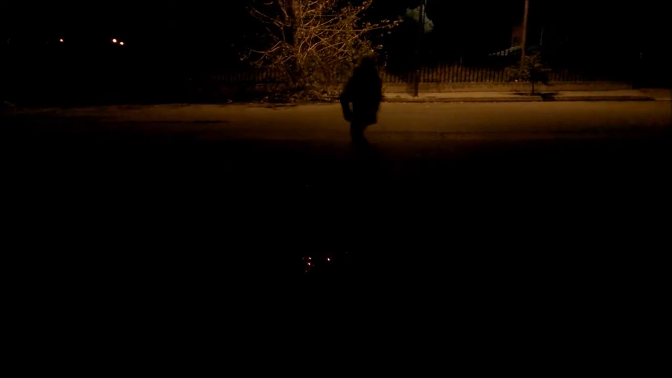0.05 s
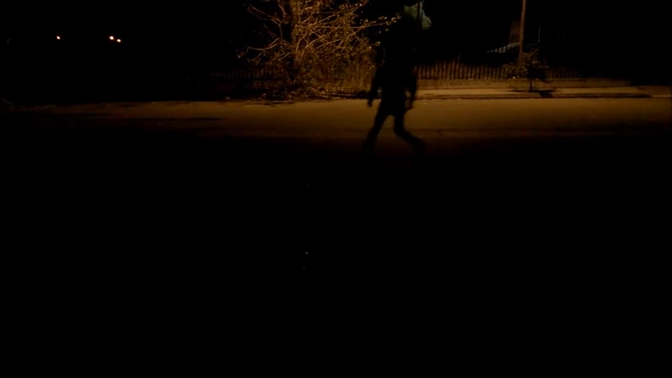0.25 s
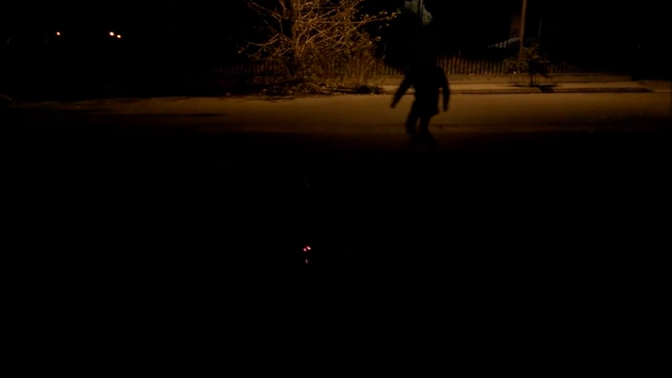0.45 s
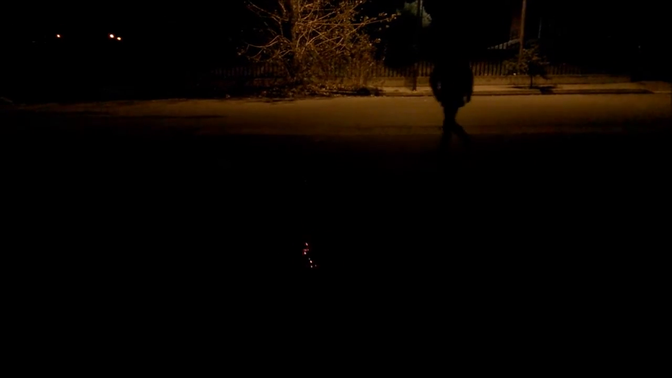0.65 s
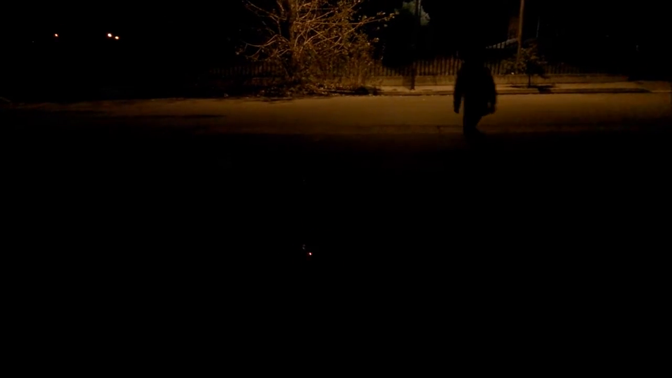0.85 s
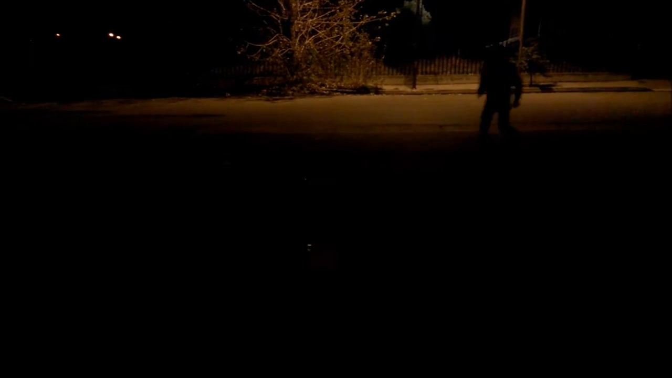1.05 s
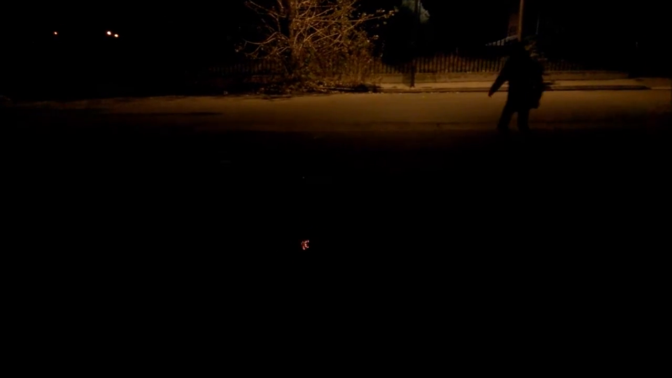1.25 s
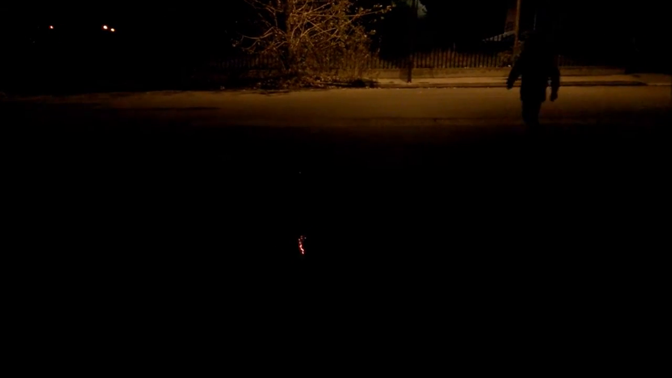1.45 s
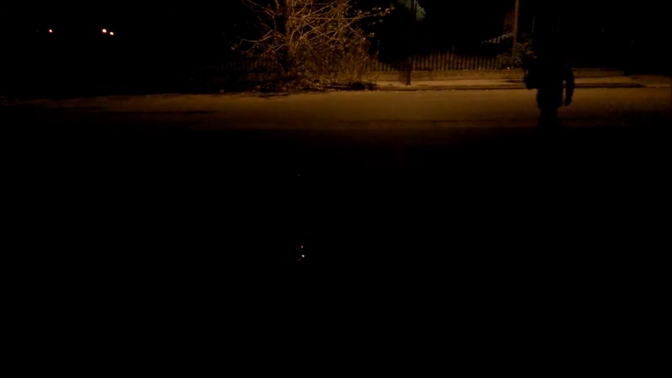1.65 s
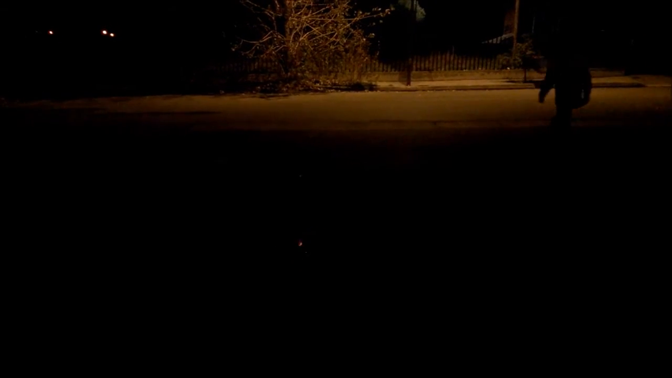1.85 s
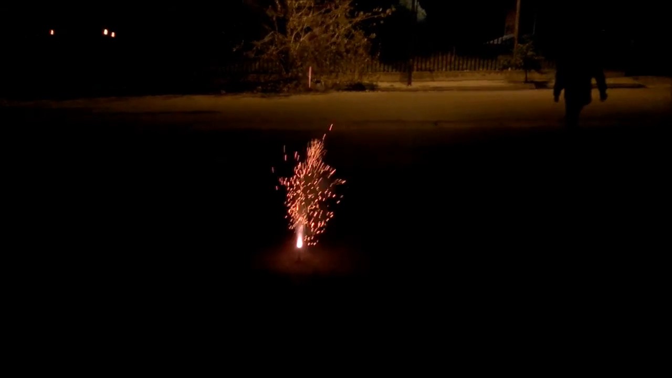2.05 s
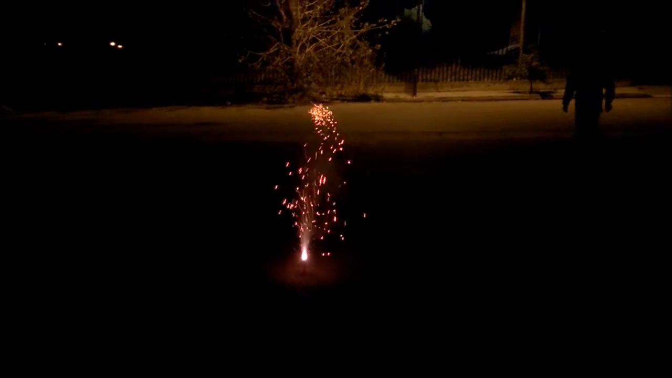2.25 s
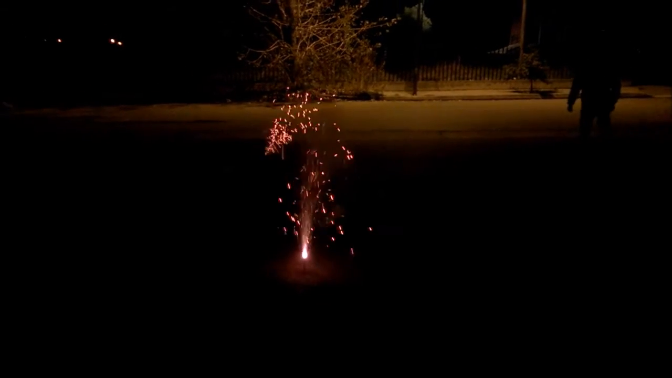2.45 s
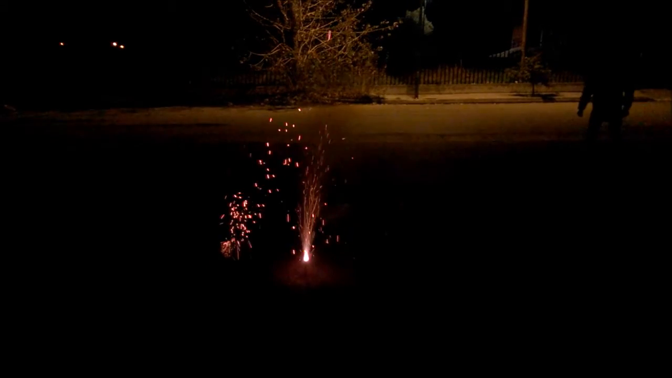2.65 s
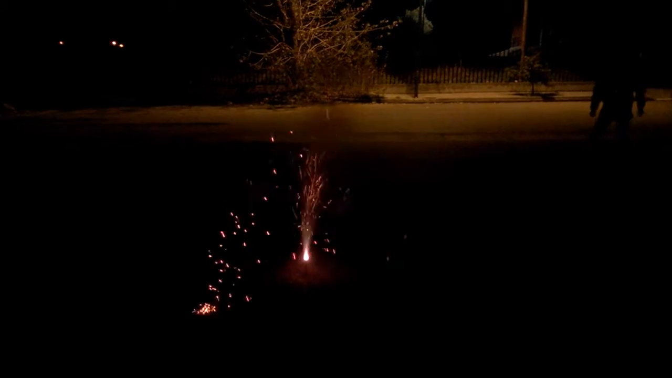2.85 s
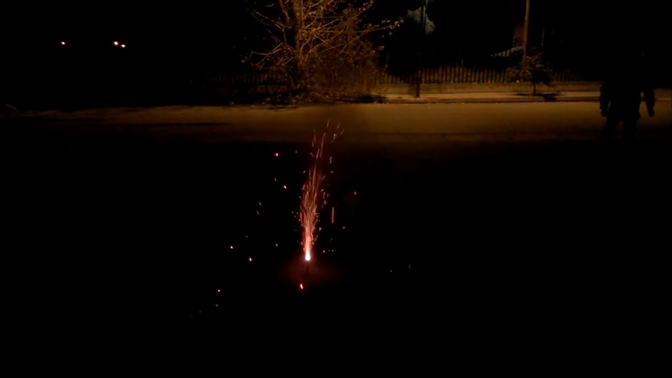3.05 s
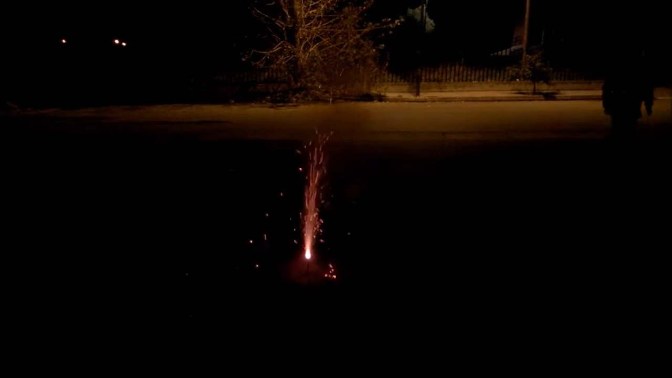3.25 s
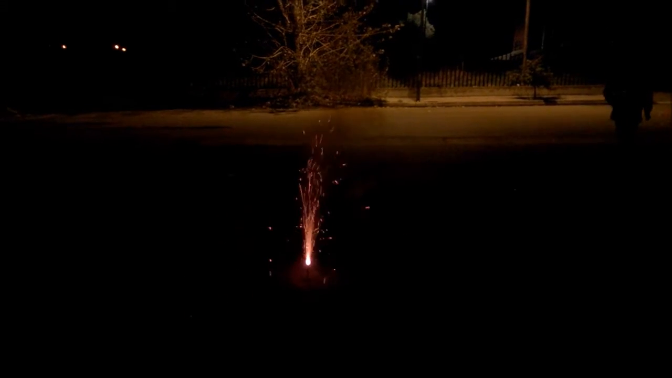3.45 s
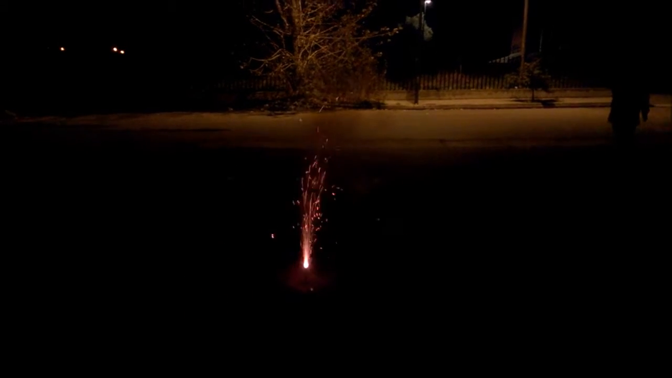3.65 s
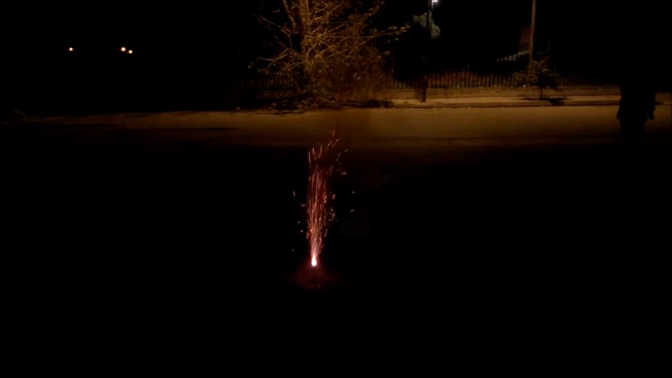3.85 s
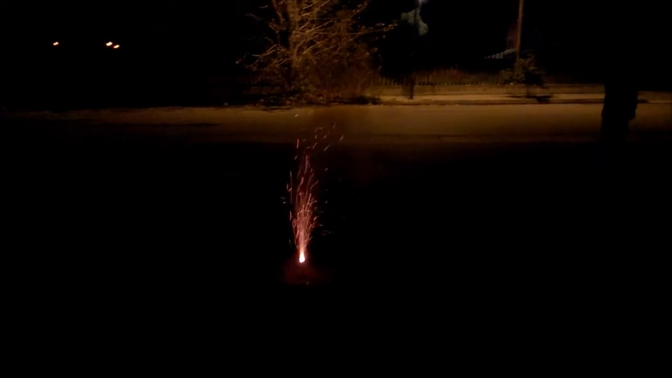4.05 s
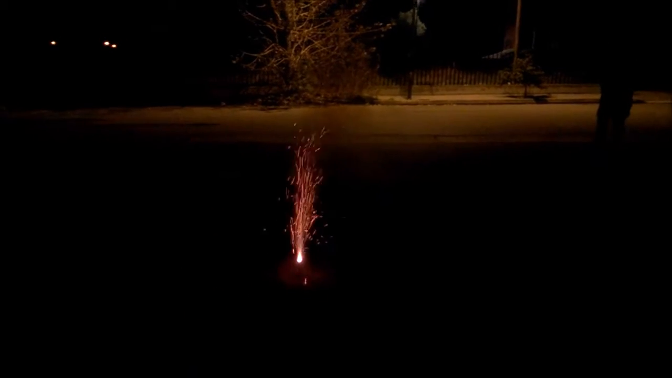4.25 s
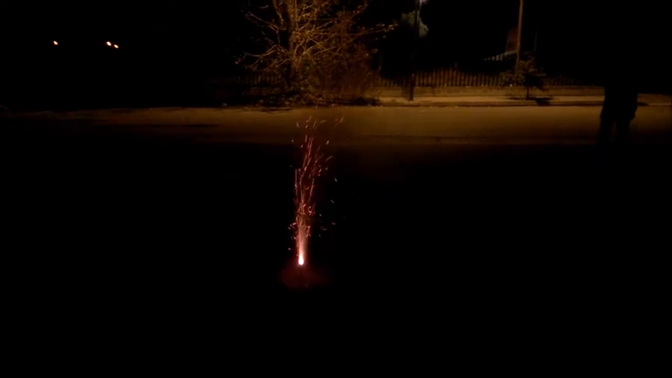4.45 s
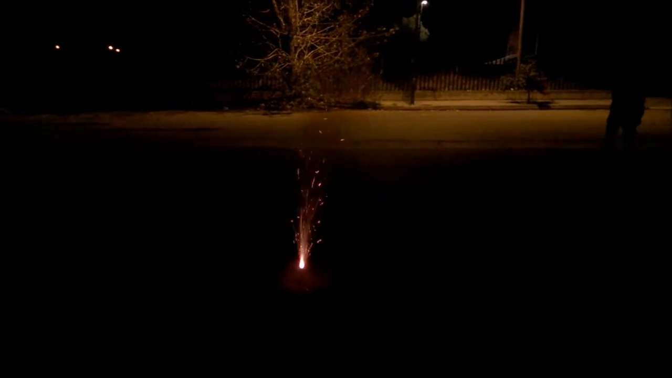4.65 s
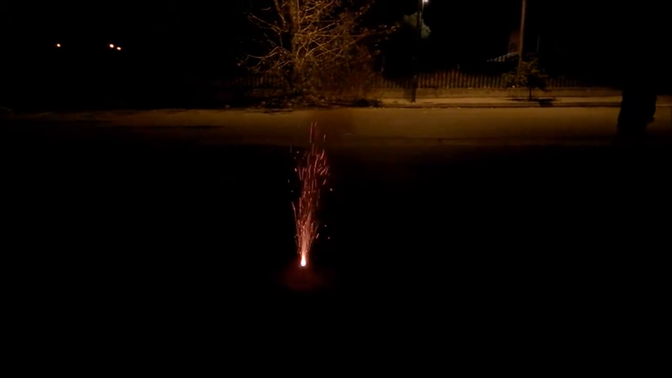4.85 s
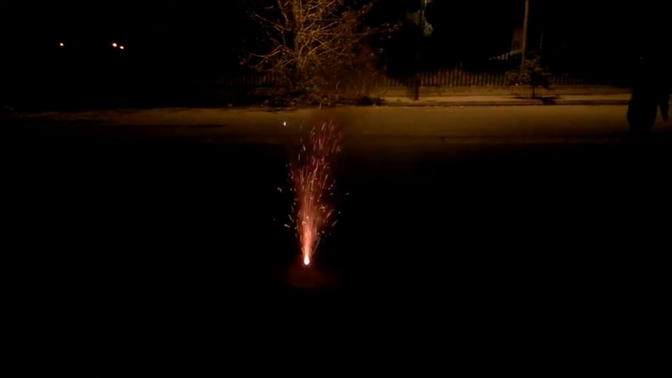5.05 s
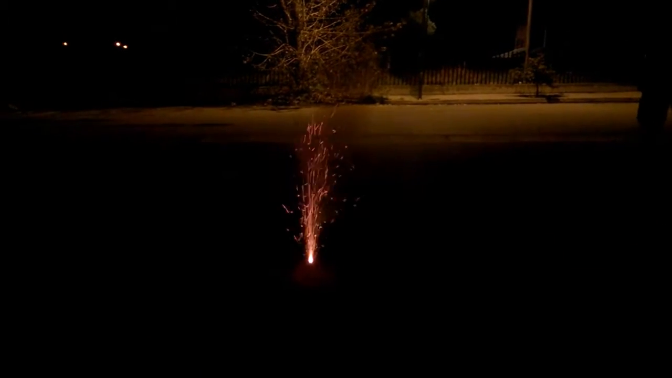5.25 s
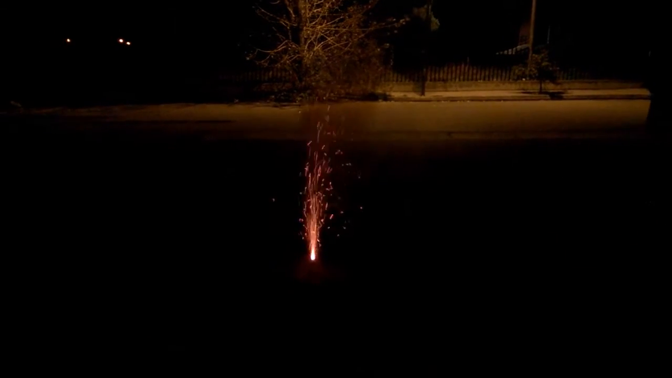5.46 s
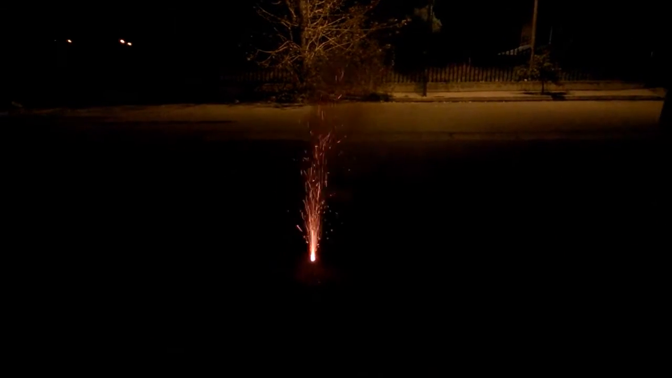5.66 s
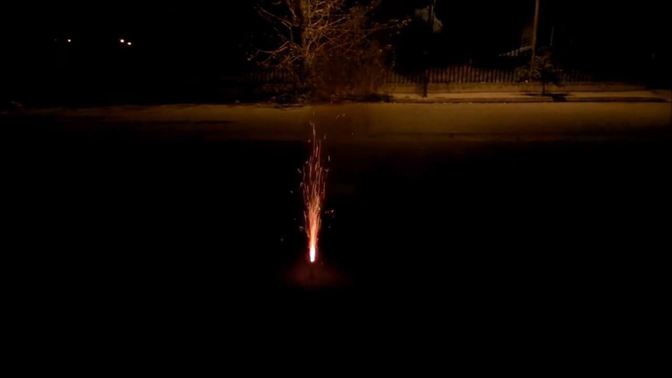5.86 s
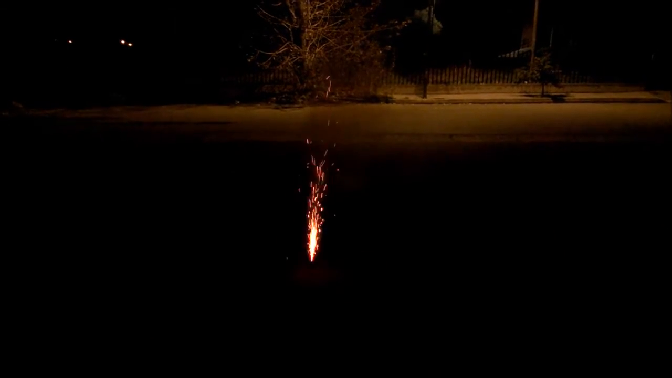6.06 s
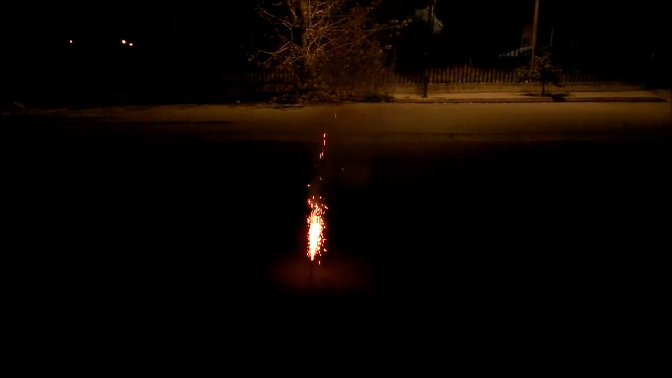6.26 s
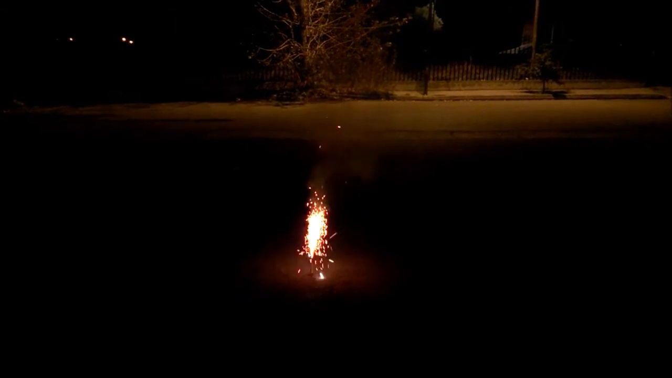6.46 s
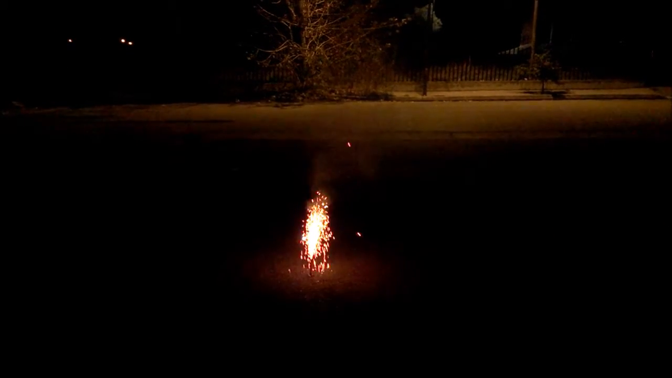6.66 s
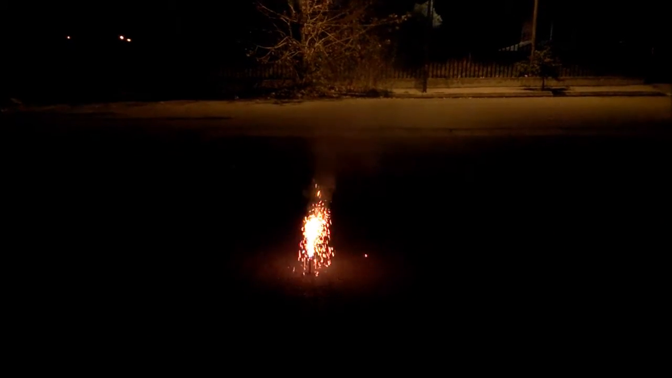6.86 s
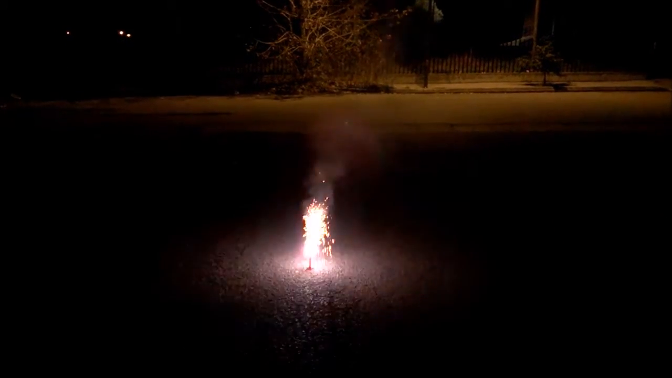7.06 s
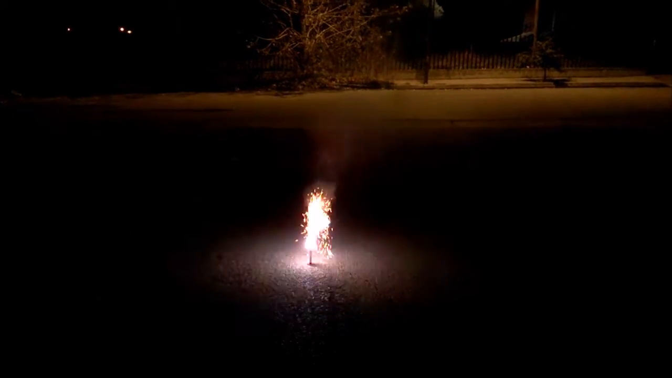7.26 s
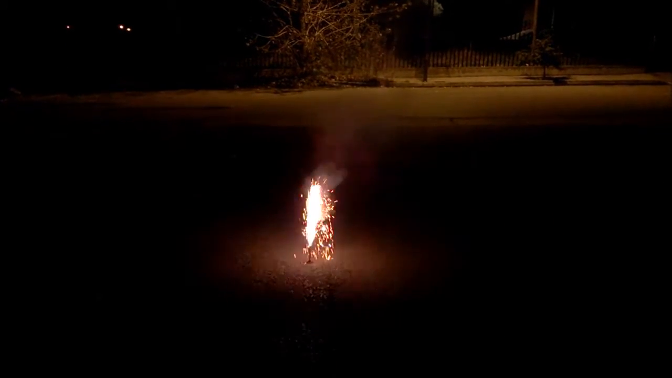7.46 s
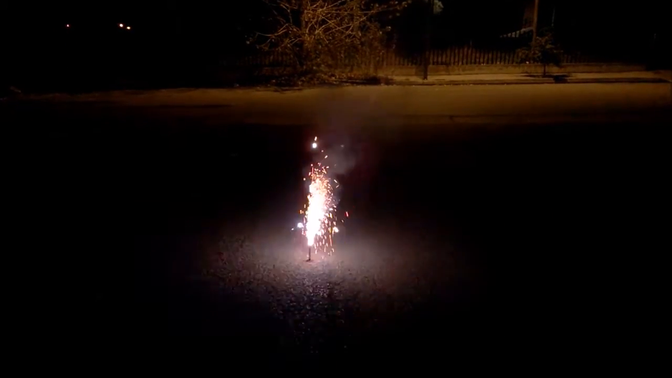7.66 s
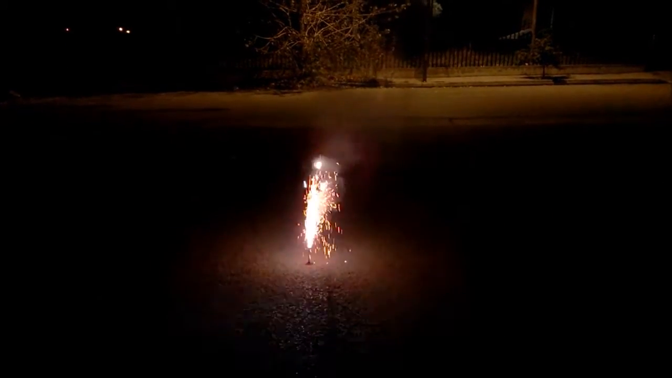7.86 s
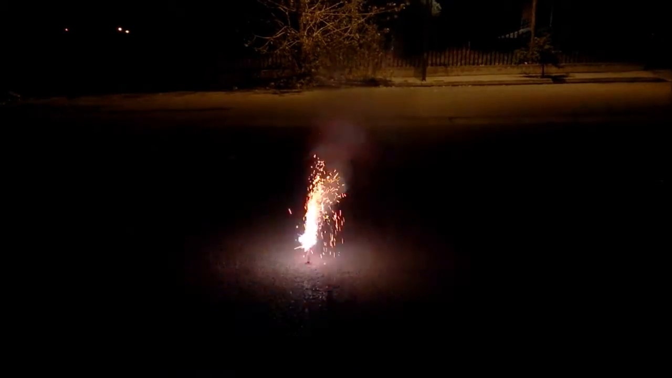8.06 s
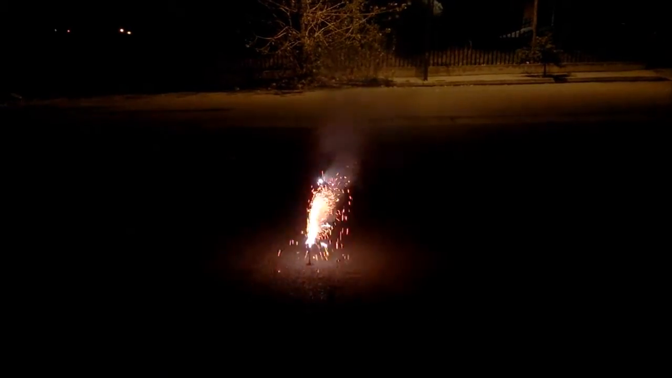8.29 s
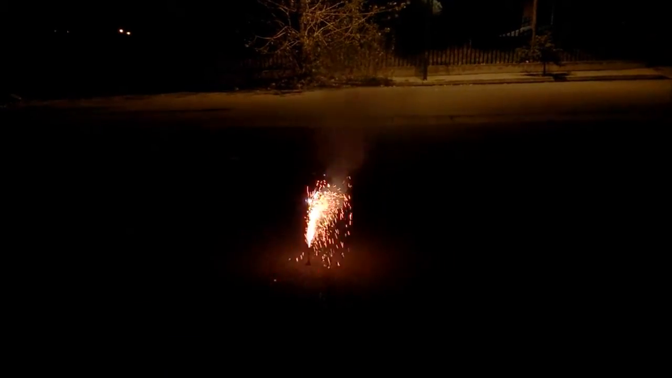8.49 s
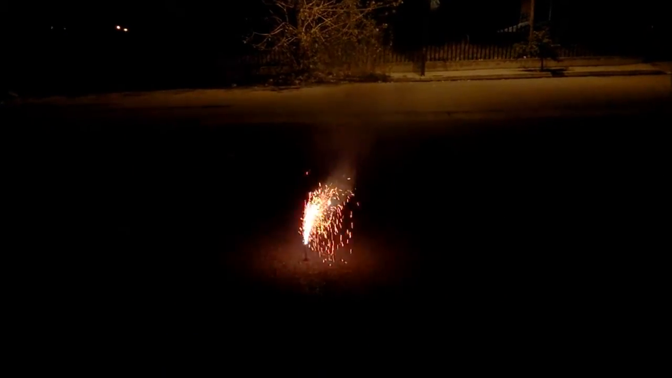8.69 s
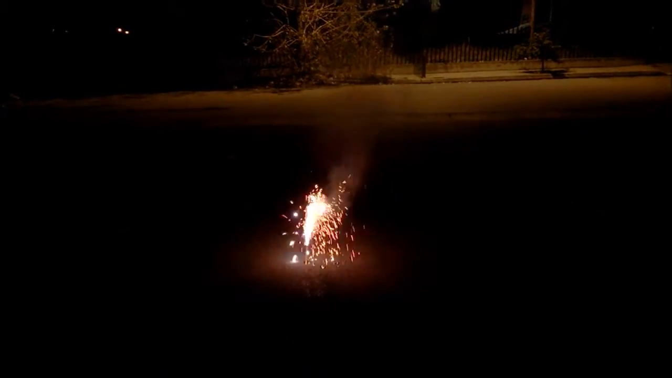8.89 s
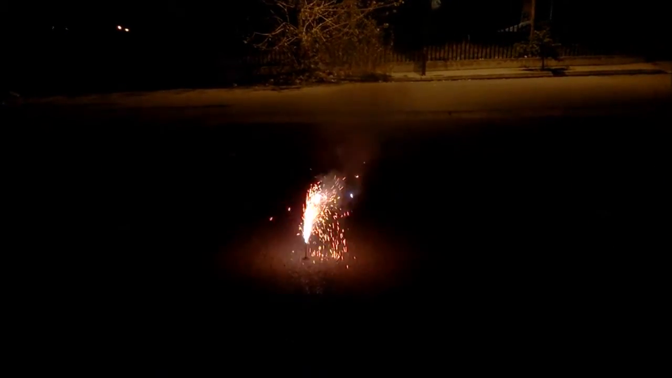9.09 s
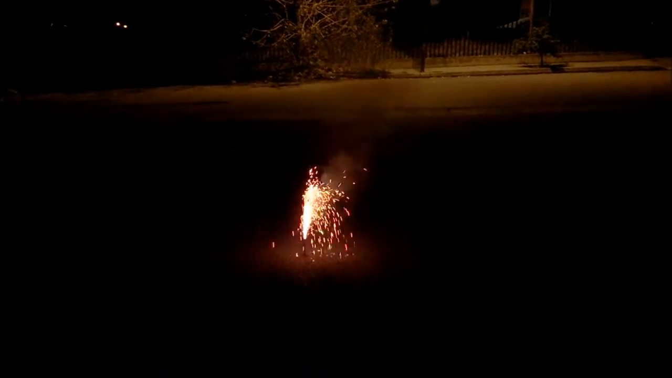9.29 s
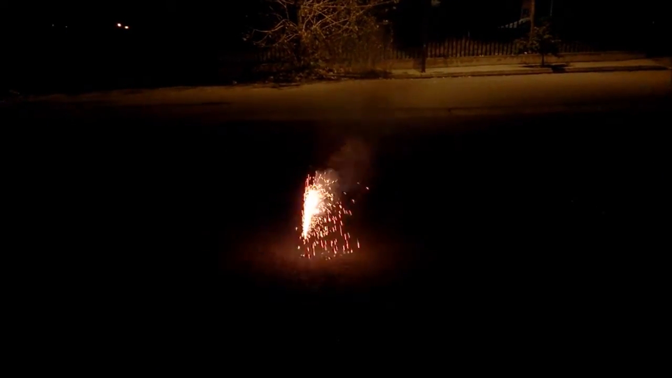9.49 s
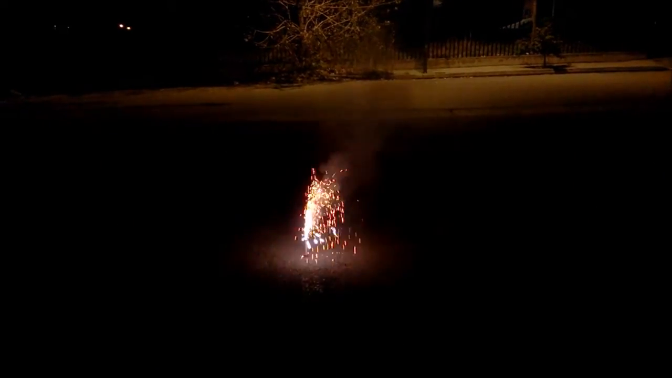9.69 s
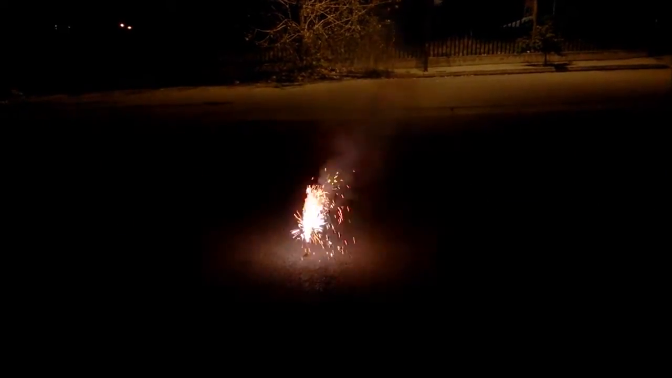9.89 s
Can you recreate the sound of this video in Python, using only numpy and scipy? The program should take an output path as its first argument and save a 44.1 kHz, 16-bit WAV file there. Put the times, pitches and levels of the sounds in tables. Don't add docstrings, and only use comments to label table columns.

```python
import sys
import numpy as np
from scipy import signal
from scipy.fft import rfft, irfft, next_fast_len
from scipy.io import wavfile
from scipy.ndimage import uniform_filter1d

SR = 44100
rng = np.random.default_rng(int(sys.argv[2]) if len(sys.argv) > 2 else 0)


def bounce(signal):
    frames = np.transpose(np.atleast_2d(signal))
    limited = np.clip(frames, -1, 1)
    pcm = np.round(limited * 32767).astype(np.int16)
    wavfile.write(sys.argv[1], SR, pcm)


def undo_db(level):
    steps = np.asarray(level, float) / 20
    return 10 ** steps


N = 437913
TIME = np.arange(N) / SR

LIT_S, OUT_S, CHOKE_S = 1.966, 5.94, 4.999
BURNING = slice(int(1.958 * SR), int(6.2 * SR))

# time in seconds, main line in dB, half-pitch lines in dB, roar in dB.
BURN_LEVELS = [(1.98, -6.5, -9, -40.5), (2.4, -8.5, -12, -45), (2.55, -14.5, -8, -43),
               (2.75, -6.5, -8.5, -43), (2.92, -9, -9.5, -43.5), (3.05, -9.5, -13, -43),
               (3.4, -14, -10.5, -46.5), (3.8, -13.5, -10.5, -51), (4.29, -17, -15.5, -55.5),
               (4.325, -20.5, -30.5, -58.5), (4.36, -17.5, -16, -56.5), (4.68, -18.5, -17, -58),
               (4.72, -19, -24, -57.5), (4.87, -19.5, -41.5, -55), (4.91, -18.5, -10, -57.5),
               (4.97, -21.5, -18, -53), (5.04, -16, -19.5, -56.5), (5.1, -18, -11.5, -47),
               (5.3, -19, -14.5, -47.5), (5.65, -19, -14.5, -53.5), (5.82, -20, -19.5, -50.5),
               (5.9, -18.5, -25, -54), (5.95, -22, -33, -58.5)]
# frequency in Hz, gain in dB.
PATH_RESPONSE = [(1300, -5.5), (2000, -3), (3000, 6), (4300, -9), (5300, -1.5), (6300, 5), (6900, 9),
                 (7800, 12.5), (8200, 1.8), (8900, 3.5), (9500, 8.5), (10250, 12), (10700, 6.5),
                 (11100, 10), (11600, 2), (12500, 5.5), (14000, -4.5), (15000, -14.5), (15700, -17.5)]
# frequency in Hz, density in dB per Hz.
FLUTTER_SPECTRUM = [(76, -26.5), (130, 6), (524, -7.5), (597, -9), (1020, -11), (1200, -18), (1560, -13.5),
                    (2640, -120)]


def columns(table):
    s, *rest = np.transpose(table)
    return [np.interp(TIME, s, c) for c in rest]


def on_log(hz, points):
    f, v = np.transpose(points)
    return np.interp(np.log(np.maximum(hz, 1)), np.log(f), v)


def unit(x):
    return x / np.sqrt(np.mean(np.abs(x) ** 2))


def colour(x, points):
    size = next_fast_len(len(x))
    gain = undo_db(on_log(np.fft.rfftfreq(size, 1 / SR), points))
    return irfft(rfft(x, size) * gain, size)[:len(x)]


def noise(points):
    return unit(colour(rng.standard_normal(N), points))


def walk(rate_hz):
    size = max(int(SR / rate_hz), 1)
    return unit(uniform_filter1d(uniform_filter1d(rng.standard_normal(N), size), size))


def complex_walk(real_hz, imag_hz):
    return (walk(real_hz) + 1j * walk(imag_hz))[BURNING]


def held(rate_hz):
    step = np.cumsum(rng.random(N) < rate_hz / SR)
    return uniform_filter1d(rng.standard_normal(N)[step], size=90)


def add(out, s, shape):
    start = int(s * SR)
    out[start:start + len(shape)] += shape


def peak(s, before_s, after_s):
    return np.interp(TIME, (s - abs(before_s), s, s + abs(after_s)), (0, 1, 0))


def scatter(times, gains, shape):
    out = np.zeros(N)
    out[(np.asarray(times) * SR).astype(int)] = gains
    return signal.fftconvolve(out, shape)[:N]


def patchy(x, depth_db):
    parts = signal.stft(x, SR, nperseg=256)[2]
    field = uniform_filter1d(rng.standard_normal(parts.shape), size=3, axis=0)
    field = uniform_filter1d(field, size=18, axis=1)
    return signal.istft(parts * undo_db(depth_db * (unit(field) - .3)), SR)[1][:len(x)]


def night():
    # frequency in Hz, density in dB per Hz.
    spectrum = [(150, -40), (250, -0.5), (427, -10.5), (823, -7), (1560, -10), (2200, -17), (3630, -23.5),
                (7630, -20), (15500, -30.5)]
    gain_db = np.interp(TIME, (5.9, 6, 9), (0, -9, -4))
    return undo_db(-61.5 + gain_db + 1.6 * walk(2.3)) * noise(spectrum)


def low_air():
    # time in seconds, rise in dB.
    gusts = [(0.0, 11.5), (.404, 8.5), (.572, 14.5), (.798, 7.5), (1.048, 0.5), (.76, 3), (1.15, 4.5),
             (1.23, 11.5), (1.31, 13), (1.39, 10.5), (1.58, 9), (1.68, 8), (1.94, 8), (6.138, 8),
             (6.34, 3.5), (6.48, 14), (6.67, 6.5), (7.3, 10.5), (7.66, 8.5), (7.85, 5), (8.12, 5.5),
             (8.5, 9.5), (8.93, 11), (9.18, 2), (9.44, 4)]
    # time in seconds, thump in dB, flutter in dB.
    thumps = [(1.994, -14.5, -21), (2.049, -19.5, -19), (2.199, -40.5, -31.5), (2.11, -38, -40.5),
              (2.28, -40.5, -32), (2.377, -35, -30.5), (3.047, -37, -37), (3.201, -31.5, -36.5),
              (3.269, -35, -37), (3.34, -34.5, -32), (3.6, -31.5, -50.5), (4.05, -34, -68),
              (4.231, -31, -50.5), (4.38, -38, -53), (4.51, -33, -50), (4.63, -41.5, -54),
              (4.958, -36, -36), (5.097, -31, -32), (5.17, -40.5, -31.5), (5.251, -42.5, -38),
              (5.33, -40, -41.5), (5.449, -40, -56.5), (5.6, -36.5, -59)]
    # frequency in Hz, density in dB per Hz.
    rumble_spectrum = [(12, -11.5), (28, -2.5), (44, -5), (55, 1), (70, 0), (110, -9), (200, -16.5),
                       (400, -45.5)]
    wind_db, gust_s = -54, 0.049
    rise_db_per_s, fall_db_per_s = 498.5, 252.5

    ducked_db = -12.5 * peak(6., .1, 20)
    gust_db = sum(db * peak(s, 0.63 * gust_s, 0.87 * gust_s) for s, db in gusts)
    burning = (TIME > LIT_S) * undo_db(np.minimum(fall_db_per_s * (5.8 - TIME), 0))
    rumble = undo_db(wind_db + ducked_db + gust_db)
    rumble = rumble + undo_db(-43.5 + 1.2 * walk(9.8)) * burning

    flame_db = -8.5 + uniform_filter1d(hiss_db(), size=4000)
    jet_db = columns(BURN_LEVELS)[2] * 0.62 - 20.5 + 1.4 * walk(5)
    flutter = undo_db(-68.5 + 3.0 * ducked_db) + undo_db(flame_db) * (TIME > OUT_S)
    flutter = flutter + undo_db(jet_db) * burning

    age_s = np.arange(-1300, 12000) / SR
    shape = undo_db(np.minimum(rise_db_per_s * age_s, -fall_db_per_s * age_s))
    for s, thump_db, flutter_db in thumps:
        lit = s + age_s > LIT_S
        add(rumble, s + age_s[0], undo_db(thump_db) * shape * lit)
        add(flutter, s + age_s[0], undo_db(flutter_db) * shape ** 1.5 * lit)
    rumble = rumble * undo_db(1.7 * walk(18)) * noise(rumble_spectrum)
    return rumble + flutter * undo_db(2 * walk(63)) * noise(FLUTTER_SPECTRUM)


def hiss_db():
    # time in seconds, level in dB.
    spray_levels = [(6.4, -81), (6.88, -67.5), (6.95, -55), (7.06, -54.5), (7.3, -51), (7.4, -50),
                    (7.495, -49), (7.51, -57), (7.59, -49.5), (7.62, -50), (7.85, -50.5), (7.97, -53),
                    (7.99, -52.5), (8.2, -56), (8.7, -56.5), (8.865, -59.5), (8.875, -52), (8.95, -59.5),
                    (9.2, -57), (9.93, -56.5)]
    # clearing time in seconds, depth in dB, clogging in seconds.
    clogs = [(6.927, 7.5, .04), (7.124, 4.5, .03), (7.069, 8, 0.06), (7.331, 15.5, 0.035), (7.405, 7, 0.1),
             (7.59, 1, 0.0304), (7.689, 14, 0.053), (7.738, 9, 0.12), (7.822, 22, .06), (8.027, 7, 0.05),
             (8.079, 6.5, 0.096), (8.191, 6, 0.031), (8.283, 11.5, 0.067), (8.444, 14, .04),
             (8.601, 19, 0.12), (8.652, 27, .05), (8.835, 11, 0.05), (9.005, 11.5, 0.057),
             (9.148, 14, 0.066), (9.446, 11, 0.13), (9.646, 13, 0.14), (9.704, 7, 0.021), (9.79, 10, 0.033),
             (9.86, 16, .04)]
    # time in seconds, rise in dB.
    puffs = [(.16, 6), (.22, 9), (.554, 1), (1.2, -3), (1.33, 7), (1.44, 4.5), (1.54, 9), (1.64, 7),
             (6.469, 22), (6.59, 11), (6.645, 12), (6.7, 12)]
    clear_s, surge_s, surge_share = .002, 0.021, 0.091

    fuse_db = -72.5 + 699 * np.maximum(TIME - 1.925, 0)
    spray_db = columns(spray_levels)[0]
    for s, depth_db, clogging_s in clogs:
        surge = surge_share * peak(s, clear_s, surge_s)
        spray_db = spray_db - depth_db * (peak(s - clear_s, clogging_s, clear_s) - surge)
    db = np.where(TIME < 1.96, fuse_db, np.where(TIME < 6.35, -100, spray_db))
    return db + sum(rise_db * peak(s, 0.011, 0.044) for s, rise_db in puffs)


def spray():
    # time in seconds, peak in dB.
    spits = [(6.4674, -45), (6.7391, -39), (6.771, -39.5), (6.8116, -41.5), (6.9278, -40.5),
             (6.9443, -34.5), (7.0296, -45), (7.1229, -34.5), (7.3337, -36), (7.37, -37), (7.4064, -43.5),
             (7.6005, -43), (7.6888, -40), (7.718, -32), (7.7459, -40.5), (7.8245, -27), (8.2786, -62.5),
             (8.3506, -44.5), (8.657, -37), (8.8351, -37), (8.9011, -31), (9.0048, -36), (9.0955, -41),
             (9.164, -43.5), (9.646, -48.5), (9.68, -50), (9.7053, -35.5), (9.792, -37), (9.82, -48),
             (8.4454, -36.5)]
    # frequency in Hz, density in dB per Hz.
    early_spectrum = [(600, -27.5), (1400, -18.5), (1900, -4.5), (2400, 2), (3000, -6), (4300, -24),
                      (5200, -23.5), (6000, -5.5), (7100, 0.5), (7800, -6.5), (8500, -16.5), (10000, -8.5),
                      (12400, -17), (15500, -33)]
    # frequency in Hz, density in dB per Hz.
    late_spectrum = [(600, -16), (1200, -14.5), (1950, 0), (2600, -8.5), (4200, -13.5), (4850, -7),
                     (5300, -8.5), (6000, -8.5), (7300, -4.5), (8400, -9), (9900, -1), (12500, -11),
                     (15500, -26.5)]

    s, peak_db = np.transpose(spits)
    age_s = np.arange(4000) / SR
    spit = np.exp(-age_s / 0.00086) + 0.073 * np.exp(-age_s / 0.033)
    burst = scatter(s, undo_db(peak_db), spit)
    grains = undo_db(hiss_db() + 1.0 + 1.6 * walk(500) + .8 * walk(40)) * rng.standard_normal(N)
    grains = grains + .5 * burst * rng.choice([-1, 1], N)
    white = rng.standard_normal(N)
    early = colour(grains, early_spectrum) / np.std(colour(white, early_spectrum))
    late = colour(grains, late_spectrum) / np.std(colour(white, late_spectrum))
    burnt = np.interp(TIME, (7.9, 8.6), (.1, .95))
    return patchy(np.sqrt(1 - burnt) * early + np.sqrt(burnt) * late, 1.7)


def steps():
    # time in seconds, peak in dB, centre in Hz.
    footfalls = [(0.04, -51.5, 520), (0.169, -53, 2470), (0.31, -52, 611), (0.373, -42.5, 610),
                 (0.775, -48, 743), (0.846, -50, 2831), (1.155, -53, 480), (1.696, -46.5, 520)]
    out, age_s = np.zeros(N), np.arange(2500) / SR
    for s, db, hz in footfalls:
        below = (hz - 1000, -25) if hz > 2000 else (170, -9)
        above = (min(hz * 2.0, hz + 700), -20)
        tint = [(80, -40), below, (hz * 0.71, -4), (hz, 0), above, (15000, -45)]
        grit = unit(colour(rng.standard_normal(len(age_s)), tint))
        add(out, s, undo_db(db) * grit * np.exp(-age_s / 0.0094) * np.minimum(age_s / .0015, 1))
    return out


def alight_db():
    catch_db = 3501 * np.minimum(TIME - LIT_S, 0)
    die_db = 462.5 * np.clip(TIME - OUT_S, 0, .06)
    return np.maximum(catch_db - die_db, -120) - 17 * peak(CHOKE_S, .01, .05)


def pitch():
    # time in seconds, pitch in Hz.
    tube_pitch = [(1.96, 5125), (2.3, 4760), (2.6, 4475), (2.8, 4290), (3, 4068), (3.2, 3944), (3.4, 3782),
                  (3.55, 3708), (3.71, 3597), (3.77, 3600), (3.86, 3562), (3.92, 3562), (4.02, 3478),
                  (4.11, 3432), (4.21, 3425), (4.3, 3348), (4.41, 3275), (4.46, 3275), (4.51, 3238),
                  (4.62, 3222), (4.7, 3168), (4.77, 3172), (4.89, 3112), (4.97, 3105), (5.03, 2940),
                  (5.07, 2995), (5.15, 2928), (5.3, 2853), (5.5, 2803), (5.62, 2768), (5.75, 2706),
                  (5.82, 2706), (5.86, 2692), (5.885, 2706)]
    # time in seconds, jump in Hz, settling in seconds.
    kicks = [
        (4.973, -90, .006),
        (4.981, 170, .003),
        (4.985, -200, .01),
        (4.994, 330, .016),
        (5.049, 140, .006),
    ]
    hz = columns(tube_pitch)[0]
    hz = hz - 630 * np.clip(1 - (TIME - 1.96) / .2, 0, 1) ** 2
    hz = hz + 300 * np.exp(np.minimum(TIME - 5.948, 0) / .012)
    return hz + sum(jump * (TIME > s) * np.exp(-np.abs(TIME - s) / settle) for s, jump, settle in kicks)


def whistle():
    # time in seconds, share 0-1, spread in Hz, split in Hz.
    stumble = [(1.95, .05, 150, 0), (2.15, .2, 200, 0), (2.3, .92, 215, 60), (2.45, .96, 190, 210),
               (2.6, .96, 210, 120), (2.72, .97, 170, 300), (2.8, .97, 160, 420), (2.91, .97, 170, 400),
               (2.98, .9, 190, 120), (3.07, .6, 185, 0), (3.12, .35, 170, 0), (3.45, .15, 150, 0),
               (5.0, .1, 150, 0), (5.1, .5, 240, 0), (5.3, .3, 260, 0), (5.98, .3, 280, 0)]
    # time in seconds, depth in dB, half width in seconds.
    fades = [(2.151, 15, .03), (2.236, 14.5, .025), (2.9, 5, 0.046), (3.3, 6.5, .05), (5.08, 3.5, .03),
             (5.25, 2, 0.055)]
    # time in seconds, share of the pitch.
    hops = [(1.96, .009), (2.0, .0025), (2.5, .0035), (4.3, .0045), (4.6, .003), (5.1, .0025),
            (5.95, .0018)]
    # multiple of half the pitch, level in dB.
    orders = [(1, -24.5), (2, 2), (3, -17), (4, -10.5), (5, -18.5), (6, -9), (7, -21), (8, -14), (9, -19.5),
              (10, -13), (11, -19.5)]
    # time in seconds, level in dB.
    fifths = [(2.199, -59), (2.35, -36), (2.55, -30.5), (2.801, -33.5), (2.95, -35), (3.1, -53.5)]
    # share of the pitch, level in dB.
    fifth_lines = [(.8, 0), (1.2, -6), (1.8, -8), (2.2, -8)]

    time, hz = TIME[BURNING], pitch()[BURNING]
    main_db, half_db, _ = (c[BURNING] for c in columns(BURN_LEVELS))
    lost, spread_hz, split_hz = (c[BURNING] for c in columns(stumble))
    fifth_db = columns(fifths)[0][BURNING]
    main_db = main_db - sum(db * peak(s, half_s, half_s) for s, db, half_s in fades)[BURNING]
    over_db = -18.5 + 1.61 * (time - LIT_S)
    over_db = over_db - 7 * peak(CHOKE_S, 0.025, 0.03)[BURNING] + 0.36 * walk(3.2)[BURNING]
    over_db = over_db - 324.5 * np.maximum(time - 5.92, 0)

    tremble = (columns(hops)[0] * held(160))[BURNING] + (.001 + .003 * lost) * walk(500)[BURNING]
    half_turn = np.cumsum(np.pi * hz * (1 + tremble) / SR)

    wide = np.clip((spread_hz - 150) / 200, 0, 1)
    slow = complex_walk(500, 500) / np.sqrt(2)
    fast = complex_walk(1500, 1500) / np.sqrt(2)
    slip = np.sqrt(1 - wide) * slow + np.sqrt(wide) * fast
    parting = np.sqrt(2) * np.cos(np.cumsum(2 * np.pi * split_hz / SR))
    slip = slip * np.where(split_hz > 0, parting, 1)
    lost = np.clip(lost, 0, 1)
    pattern = np.sqrt(1 - lost) + np.sqrt(lost) * slip
    pattern = pattern * undo_db(half_db + 2.0 * walk(140)[BURNING])

    lighting_db = 18 * np.exp(-((time - 1.99) / .1) ** 2)
    ragged = .062 * complex_walk(620, 500)
    tone = 0
    for k, order_db in orders:
        sway_db = 1.3 * (1 - 1.3 * lost) if k % 2 else 1.2
        db = order_db + sway_db * walk(42)[BURNING] + lighting_db * (k < 1.5)
        way = undo_db(on_log(k * hz / 2, PATH_RESPONSE))
        if k > 2:
            way = way + undo_db(-10.5) * complex_walk(140, 60)
        size = pattern if k % 2 else undo_db(over_db if k > 2 else main_db) * (1 + ragged)
        wave = (way * size * np.exp(1j * (k * half_turn + k * k / 2))).real
        tone = tone + np.sqrt(2) * undo_db(db) * wave * (k * hz / 2 < 15750)

    blur = complex_walk(250, 250)
    for share, db in fifth_lines:
        level = undo_db(fifth_db + db + on_log(share * hz, PATH_RESPONSE))
        tone = tone + level * (blur * np.exp(2j * share * half_turn)).real
    out = np.zeros(N)
    spent_s = np.maximum(time - 5.961, 0)
    out[BURNING] = undo_db(alight_db()[BURNING]) * tone * np.exp(-spent_s / 0.0056)
    return out


def gas_roar():
    # frequency in Hz, density in dB per Hz ahead of the path.
    spectrum = [(200, -26), (700, -13.5), (1900, -11), (3100, -4.5), (4200, 1.5), (5600, -10), (7500, -8),
                (12000, -8), (15500, -8)]
    time = TIME[BURNING]
    roar_db = columns(BURN_LEVELS)[2][BURNING]
    roar = colour(colour(rng.standard_normal(len(time)), spectrum), PATH_RESPONSE)
    roar = patchy(roar, 3) * undo_db(roar_db + 27.5 + walk(23)[BURNING])
    spent_s = np.maximum(time - 5.961, 0)
    out = np.zeros(N)
    out[BURNING] = undo_db(alight_db()[BURNING]) ** 0.36 * roar * np.exp(-spent_s / 0.043)
    return out


def surroundings(x):
    # delay in seconds, level in dB.
    echoes = [
        (.105, -21),
        (.185, -34),
    ]
    # frequency in Hz, t60 in seconds.
    decay = [(1400, 1.5), (3000, 1.55), (5500, .95), (8000, .8), (11000, .55), (14000, 0.33)]
    # frequency in Hz, gain in dB.
    tint = [(1400, 6), (2700, -2.5), (2860, -6), (3000, -11), (4300, 4), (5500, 6), (8200, 4), (11000, -2),
            (14000, -11)]

    hz, t, tail = signal.stft(rng.standard_normal(int(1.8 * SR)), SR, nperseg=256)
    tail = signal.istft(tail * undo_db(-60 * t / on_log(hz, decay)[:, None]), SR)[1]
    tail = undo_db(-20.5) * tail / np.linalg.norm(tail)
    tail = tail * undo_db(8 * np.exp(-np.arange(len(tail)) / SR / .07))
    for s, db in echoes:
        front = rng.standard_normal(900) * np.exp(-np.arange(900) / SR / .004)
        add(tail, s, undo_db(db) * front / np.linalg.norm(front))
    wet = signal.fftconvolve(x, np.r_[np.zeros(600), tail])[:N]
    return x + colour(wet, tint)


def blasts():
    # time in seconds, level in dB.
    gas_blasts = [(2.015, -19.5), (2.063, -21.5), (2.11, -36), (2.195, -31), (2.21, -28.5), (2.38, -31)]
    size = sum(undo_db(db) * peak(s, .006, 0.028) for s, db in gas_blasts)
    return size * noise([(150, -5.5), (500, 0), (2500, -3.5), (3600, -11), (6000, -40)])


def pops():
    # time in seconds, peak in dB, push in ms.
    spark_pops = [(6.469, -43.5, 0.37), (6.586, -50.5, 0.55), (6.85, -43, 0.5), (7.209, -44, 0.225),
                  (7.276, -43.5, 0.26), (7.344, -45, 0.46), (7.825, -45, 0.46), (7.985, -47.5, 0.87),
                  (8.105, -42, 0.98), (8.362, -43, 0.12), (8.439, -46, 0.48), (8.903, -33, 0.11),
                  (8.913, -31.5, 0.3), (8.929, -50, 0.42), (9.087, -47.5, 0.36), (9.443, -50.5, 0.5),
                  (9.702, -43, 0.65)]
    out, age_ms = np.zeros(N), np.arange(2000) / SR * 1000
    for s, db, push_ms in spark_pops:
        a = age_ms / max(push_ms, .15)
        push = a * np.exp(-a * a / 2) - 0.38 * a / 3.5 * np.exp(-(a / 2.5) ** 2 / 2)
        rustle = unit(colour(rng.standard_normal(len(a)), FLUTTER_SPECTRUM)) * np.exp(-age_ms / 14)
        add(out, s, undo_db(db + 8) * push + undo_db(db - 11) * rustle)
    return out


def scene():
    fountain = surroundings(whistle() + gas_roar())
    mono = night() + low_air() + spray() + steps() + fountain + blasts() + pops()
    return np.array([mono, mono])


def starve(x):
    starved_s = [.19, .49, .81, .87, .935, 1.73, 2.152, 2.258, 2.47, 2.6, 3.3, 3.475, 3.585, 4.29, 4.33,
                 4.54, 4.67, 5.16, 5.225, 5.31, 7.955, 9.535, 5.69, 5.78, .125, 1.92, 6.91, 7.1, 7.72, 8.0,
                 8.61, 9.34, 9.615]
    emptied_s = [.865, .885, 6.33, 7.55, 8.2, 9.29]
    # frequency in Hz, threshold in dB.
    thin_top = [(13500, -48), (14500, -41), (15000, -33), (15700, -27)]
    seams_hz = [4370, 5200, 8250, 11600, 13300]

    hz, t, parts = signal.stft(x, SR, nperseg=1024)
    rows_hz = hz[:, None]
    power = np.abs(parts) ** 2
    nearby = uniform_filter1d(power, size=40, axis=0)
    short = np.abs(t[:, None] - np.array(starved_s)).min(axis=1) < .009
    empty = np.abs(t[:, None] - np.array(emptied_s)).min(axis=1) < .02
    bar = np.where(short, 1.5, .0015) * nearby
    bar = np.where(empty, 1.3 * uniform_filter1d(power, size=160, axis=0), bar)
    kept = (power > bar) | (rows_hz < np.where(t < LIT_S, 1600, 300))

    band = np.add.reduceat(power, np.arange(0, len(hz), 6)) / 6
    band = np.repeat(band, 6, axis=0)[:len(hz)]
    band = uniform_filter1d(band, size=4, axis=1)
    faint = band < 8e-4 * uniform_filter1d(power, size=40, axis=0, origin=8)
    floor = undo_db(2 * on_log(hz, thin_top))[:, None] * power.mean(axis=0)
    thin = (rows_hz > thin_top[0][0]) & (band < floor)
    seam = undo_db(-7 * (np.abs(rows_hz - seams_hz).min(axis=1) < 30))[:, None]
    parts = parts * seam * np.where(faint, .07, 1) * np.where(thin, .002, 1)
    parts = parts * np.where(kept, 1, np.where(empty, .03, .18))
    return signal.istft(parts, SR)[1][:N]


def low_pass(x):
    return signal.sosfilt(signal.butter(12, 15640, fs=SR, output="sos"), x)


def record(dry):
    mono = starve(np.clip(dry[0], -.97, .97))
    return low_pass(np.array([mono, mono]))


dry = scene()
out = record(dry)
bounce(out)
```